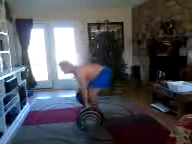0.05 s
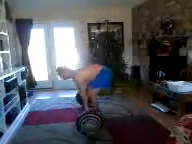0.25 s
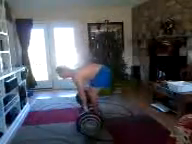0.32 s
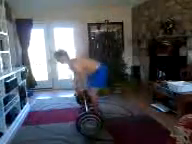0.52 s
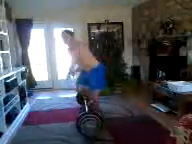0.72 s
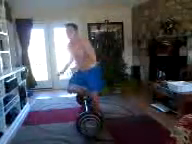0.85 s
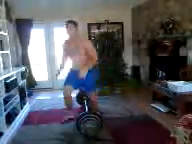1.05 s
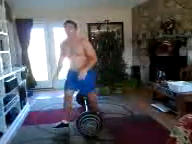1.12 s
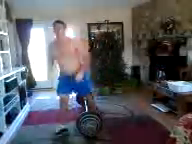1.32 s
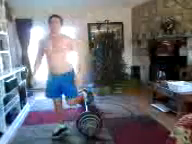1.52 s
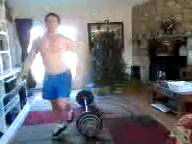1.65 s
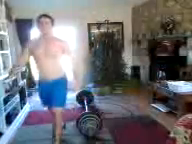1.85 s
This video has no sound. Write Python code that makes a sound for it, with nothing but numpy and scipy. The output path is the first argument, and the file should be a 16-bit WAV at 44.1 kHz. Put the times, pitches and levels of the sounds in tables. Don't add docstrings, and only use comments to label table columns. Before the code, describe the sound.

After a faint shuffle, heavy iron plates hit the floor with a low boom and harsh bouncing clanks, settle into a short ring, then quiet room air and one soft footstep; muffled narrow-band microphone, clipped peaks.

```python
import sys
import numpy as np
from scipy import signal
from scipy.fft import rfft, irfft, next_fast_len
from scipy.io import wavfile
from scipy.ndimage import map_coordinates

SR = 44100
rng = np.random.default_rng(int(sys.argv[2]) if len(sys.argv) > 2 else 0)


def natural_amplitude(level_db):
    exponent = np.asarray(level_db, float) / 20
    return 10 ** exponent


def materialize(psi):
    bounded = np.clip(np.atleast_2d(psi).T, -1, 1)
    quanta = np.round(bounded * 32767).astype(np.int16)
    wavfile.write(sys.argv[1], SR, quanta)


N = 83790
T = np.arange(N) / SR


def unit(x):
    return x / np.sqrt(np.mean(x ** 2) + 1e-20)


def along(points, hz):
    f, v = np.transpose(points)
    return np.interp(np.log(hz + 1), np.log(f + 1), v)


def filtered(x, response):
    m = next_fast_len(N + SR)
    return irfft(rfft(x, m) * response(np.fft.rfftfreq(m, 1 / SR)), m)[..., :N]


def resonances(peaks):
    def response(f):
        total = 0
        for k, (centre, width, db) in enumerate(peaks):
            damping = 1j * f * width
            total = total + (-1) ** k * natural_amplitude(db) * damping / (centre * centre - f * f + damping)
        return total
    return response


def noise(spectrum, lumpy_db=0, rate=60):
    points = rng.standard_normal(int(N * rate / SR) + 4)
    lumps = map_coordinates(points, [T * rate])
    uneven = rng.standard_normal(N) * natural_amplitude(lumpy_db * lumps)
    return unit(filtered(uneven, lambda hz: natural_amplitude(along(spectrum, hz))))


def dying(rows, attack_s):
    total = 0
    for s, db, t60 in rows:
        attack = np.clip((T - s) / attack_s, 0, 1)
        total = total + natural_amplitude(db - 60 * np.abs(T - s) / t60) * attack
    return total


# frequency in Hz, density in dB per Hz.
AIR_SPECTRUM = [(18, -59), (30, -33), (118, -4), (155, -12), (186, -2.5), (249, -20.5), (355, -16),
                (3200, -32.5), (4280, -58.5), (5560, -77.5), (9420, -120)]


def room_air():
    return natural_amplitude(-58.5) * noise(AIR_SPECTRUM, lumpy_db=3.0, rate=25)


# frequency in Hz, t60 in seconds.
ROOM_DECAY = [(100, 0.93), (500, 0.66), (1500, 0.58), (4000, .4)]


def room(x):
    hz, t, z = signal.stft(rng.standard_normal(SR), SR, nperseg=256)
    decay = natural_amplitude(-60 * t / along(ROOM_DECAY, hz)[:, None])
    tail = signal.istft(z * decay, SR, nperseg=256)[1]
    tail = filtered(tail, lambda f: 1 / (1 + (f / 5000) ** 8))
    delayed = np.pad(x, (300, 0))
    return signal.fftconvolve(delayed, tail / np.linalg.norm(tail))[:N]


# start in seconds, level in dB, t60 in seconds.
FOOT_CONTACTS = [
    (1.3805, -31.5, 0.12),
    (1.398, -38.5, 0.13),
    (1.417, -39, 0.11),
    (1.452, -43.5, 0.092),
    (1.315, -55, 0.52),
    (1.49, -58.5, 0.29),
]
# frequency in Hz, density in dB per Hz.
SOLE_SPECTRUM = [(88, -56.5), (150, -22.5), (480, -8), (636, -5.5), (752, -4.5), (878, -1), (1650, -15.5),
                 (3100, -20.5), (4280, -45), (5560, -75), (9420, -120)]
# frequency in Hz, width in Hz, level in dB.
MAT_TONES = [(600, 60, -3.5), (854, 108, 4.5), (1100, 50, -30), (1350, 60, -12.5)]
# start in seconds, level in dB, t60 in seconds.
FOOT_SHUFFLES = [
    (0, -42, 0.31),
    (.125, -58, .3),
    (.99, -59, 1),
]
# frequency in Hz, density in dB per Hz.
SCUFF_SPECTRUM = [(59, -48), (100, -11.5), (265, -3), (380, -22), (629, -11), (1020, -9), (1130, -16),
                  (2760, -25.5), (4280, -48), (5560, -78), (9420, -120)]


def feet():
    slap = noise(SOLE_SPECTRUM, lumpy_db=0.0, rate=350)
    slap = slap + natural_amplitude(-4) * unit(filtered(slap, resonances(MAT_TONES)))
    scuff = noise(SCUFF_SPECTRUM, lumpy_db=5, rate=21.2)
    scuff = scuff + natural_amplitude(-5.5) * unit(filtered(scuff, resonances(MAT_TONES[:1])))
    return dying(FOOT_CONTACTS, 0.0019) * slap + dying(FOOT_SHUFFLES, 0.031) * scuff


# start in seconds, swell in seconds, pitch in Hz, level in dB.
FLOOR_BOOMS = [
    (.2, 0.025, 66, -9),
    (.196, 0.0067, 230, -24),
    (.198, .008, 440, -30.5),
    (.212, 0.019, 200, -16.5),
    (0.21, 0.031, 270, -24),
    (0.35, 0.026, 76, -28),
    (0.47, 0.022, 200, -20.5),
    (.335, 0.01, 250, -25.5),
    (.49, .012, 480, -22.5),
]
# frequency in Hz, density in dB per Hz.
BOARD_SPECTRUM = [(18, -44.5), (30, -16.5), (75, -8.5), (172, -3), (211, 0), (450, -14.5), (580, -41.5),
                  (990, -120)]
GLIDE_HZ_PER_S = 800


def floor_boom():
    rumble = noise(BOARD_SPECTRUM, lumpy_db=2.5, rate=40)
    out = dying([(0.215, -19, 1.0)], 0.012) * rumble
    for s, swell, hz, db in FLOOR_BOOMS:
        t = np.clip(T - s, 0, None)
        pulse = (t / swell) ** 2 * np.exp(1 - (t / swell) ** 2)
        phase = 2 * np.pi * (hz + GLIDE_HZ_PER_S * t / 2) * t - 0.95
        out += natural_amplitude(db) * pulse * np.sin(phase)
    return out


# start in seconds, pitch in Hz, level in dB, t60 in seconds, beats per second.
FREE_RINGS = [
    (.835, 1137, -48, 1.2, 5),
    (.548, 1256, -20, .22, 3),
    (.615, 2607, -27, .4, 17),
    (.52, 1137, -27, .3, 1),
    (.65, 1137, -19, .3, 1),
    (.7, 2258, -44, .6, 5),
    (.24, 1262, -20, .35, 4),
]


def rings():
    out = np.zeros(N)
    for s, hz, db, t60, beat in FREE_RINGS:
        t = np.clip(T - s, 0, None)
        pair = np.sin(2 * np.pi * hz * t) + 0.75 * np.sin(2 * np.pi * (hz + beat) * t)
        out += natural_amplitude(db - 60 * t / t60) * np.clip(t / 0.018, 0, 1) * pair
    return out


# time in seconds, signed peak size (full scale 1).
IRON_CRACKS = [
    (.2292, .8),
    (.248, .72),
    (.275, .7),
    (.2857, -.745),
    (.305, -.68),
    (.4049, .68),
    (.4109, -.84),
]
CRACK_HZ, CRACK_S = 1400, 0.0005


def cracks(wash):
    for s, size in IRON_CRACKS:
        blink = np.exp(-((T - s) / CRACK_S) ** 2)
        knock = size * np.cos(2 * np.pi * CRACK_HZ * (T - s))
        wash = wash * (1 - blink) + blink * knock
    return wash


# start in seconds, peak in dB, pitch in Hz.
HARD_CLANKS = [(0.2464, -7.5, 1318), (0.2653, -6, 2248), (0.2724, -7, 1300), (0.3135, -1.5, 1253),
               (0.3325, -5.5, 1260), (0.4024, -5, 1438), (0.4108, -4, 1403), (0.4219, -5.5, 2480),
               (0.4561, -2.5, 1666), (0.4991, -13.5, 1746), (0.5563, -3, 1274), (0.5942, -18, 1288),
               (0.627, -17, 1114), (0.665, -23.5, 1180)]
CLANK_T60_S, CLANK_DB = 0.066, -5.5


def clanks():
    out = np.zeros(N)
    detunings = rng.standard_normal((len(HARD_CLANKS), 3))
    for (s, db, hz), detuning in zip(HARD_CLANKS, detunings):
        t = np.clip(T - s, 0, None)
        cluster = sum(np.sin(2 * np.pi * hz * (1 + 0.027 * d) * t) for d in detuning) / 2
        out += natural_amplitude(db + CLANK_DB - 60 * t / CLANK_T60_S) * np.clip(t / 0.005, 0, 1) * cluster
    return out


# time in seconds, strength in dB, low colour in dB, top colour in dB.
RATTLE_COURSE = [
    (0.202, -54, 15, 1),
    (0.212, -18.5, -10.5, 3),
    (0.237, -11.5, 3, 0),
    (0.269, -11.5, -0.5, -2.5),
    (.41, -13.5, 1, 2),
    (0.499, -24, 5, 2.5),
    (.68, -30.5, 6.5, -21),
    (.77, -41.5, 5.5, -28.5),
    (0.859, -58, 3.5, -10.5),
]
# frequency in Hz, density in dB per Hz.
IRON_SPECTRUM = [(150, -41), (250, -16), (554, -9), (610, -7.5), (1270, -5), (1980, -6.5), (2600, -1.5),
                 (3370, -9), (4280, -30.5), (5560, -69), (9420, -120)]
# frequency in Hz, level in dB, t60 in seconds.
PLATE_MODES = [(769, -23.5, 0.14), (905, -4.5, 0.29), (1076, -8.5, .2), (1245, -4, 0.74),
               (1352.8, -5.5, 0.66), (1411, -8, .3), (1528, -9, .3), (1611, -3, 0.23), (1757, -10, 0.43),
               (2169, -8.5, 0.67), (2250, -8.5, 0.26), (2363, -8, 0.23), (2575, -5.5, .3),
               (2664, -8.5, 0.26)]
CONTACTS_PER_S, CONTACT_SPREAD_DB = 1500, 3
RATTLE_DB, GRIT_DB, RING_DB = -3.5, -1, -7.5


def rattle():
    s, db, low_db, top_db = np.transpose(RATTLE_COURSE)
    strength = natural_amplitude(np.interp(T, s, db, left=-120, right=-120) + RATTLE_DB)

    chance, size = rng.random((2, N))
    contact = chance < CONTACTS_PER_S / SR
    force = natural_amplitude(-CONTACT_SPREAD_DB * np.log(size + 1e-9))
    hits = unit(contact * force * np.sign(rng.standard_normal(N)))

    rough = hits + 0.65 * rng.standard_normal(N)
    grit = unit(filtered(rough, lambda hz: natural_amplitude(along(IRON_SPECTRUM, hz))))
    low = filtered(grit, lambda hz: 1 / (1 + (hz / 1600) ** 4))
    top = filtered(grit, lambda hz: 1 - 1 / (1 + (hz / 2900) ** 6))
    middle = grit - low - top
    grit = middle + natural_amplitude(np.interp(T, s, top_db)) * top + natural_amplitude(np.interp(T, s, low_db)) * low

    modes = resonances([(hz, np.log(1000) / np.pi / t60, level) for hz, level, t60 in PLATE_MODES])
    ringing = filtered(strength * hits, modes) / np.std(filtered(hits, modes))
    return natural_amplitude(GRIT_DB) * strength * grit + natural_amplitude(RING_DB) * ringing


def scene():
    near = rattle() + clanks() + feet()
    ring, boom = rings(), floor_boom()
    reverb = natural_amplitude(-10.5) * room(near + 0.2 * ring + 0.158 * boom)
    wash = near + ring + boom + reverb + room_air()
    squash = 0.6
    return cracks(squash * np.tanh(wash / squash))[None]


def band_limit(x):
    return signal.sosfilt(signal.butter(12, 15850, fs=SR, output="sos"), x)


def record(dry):
    top_hz, steepness, clip = 4400, 60, 0.705
    x = filtered(dry, lambda hz: 1 / (1 + (hz / top_hz) ** steepness))
    return band_limit(np.clip(x, -clip, clip))


dry = scene()
out = record(dry)
materialize(out)
```